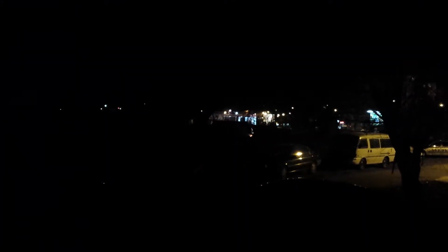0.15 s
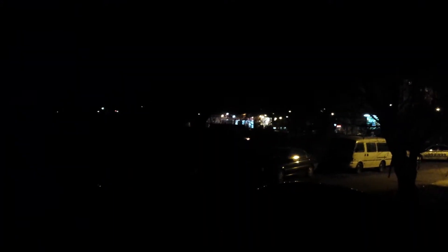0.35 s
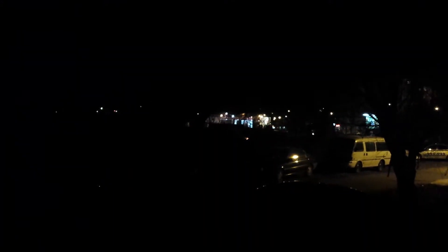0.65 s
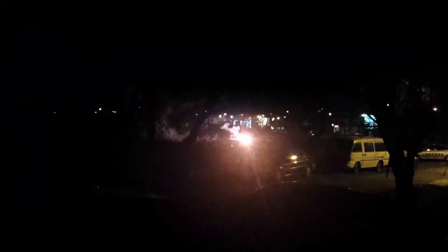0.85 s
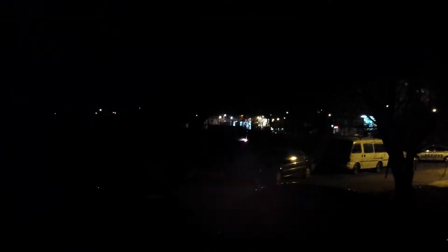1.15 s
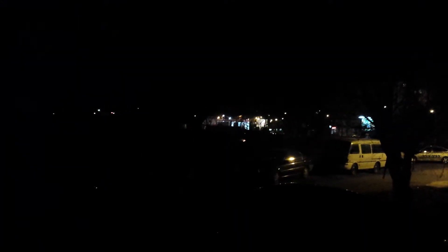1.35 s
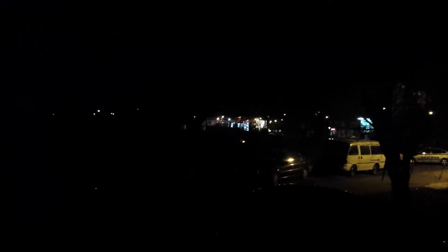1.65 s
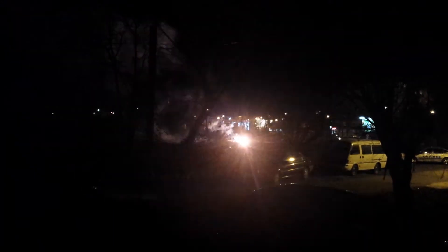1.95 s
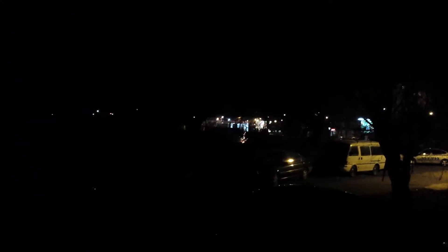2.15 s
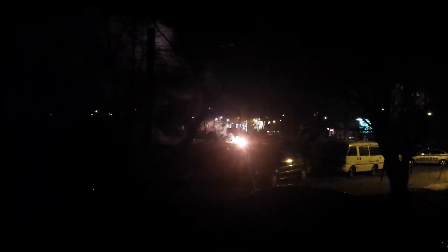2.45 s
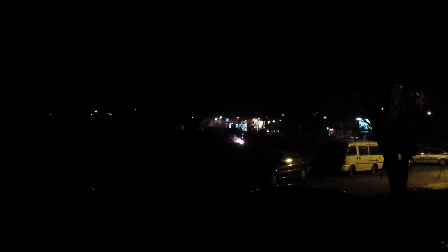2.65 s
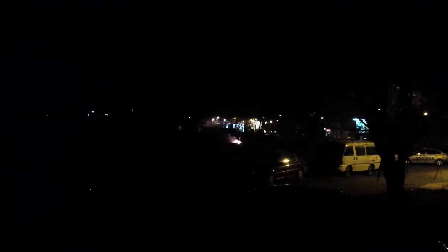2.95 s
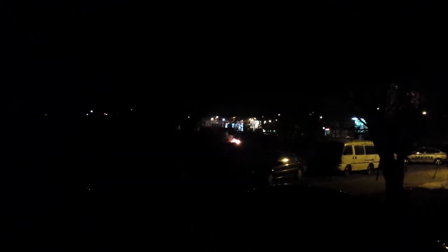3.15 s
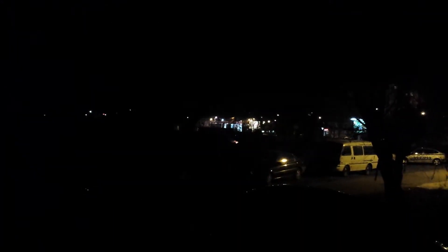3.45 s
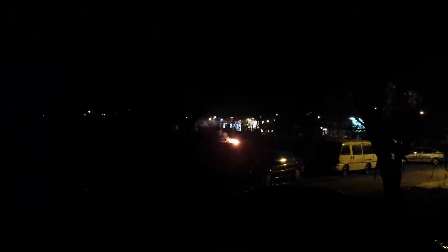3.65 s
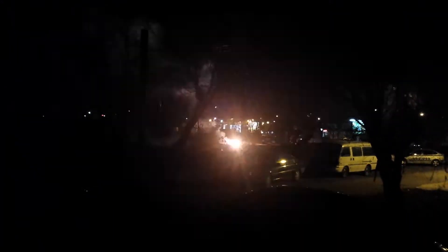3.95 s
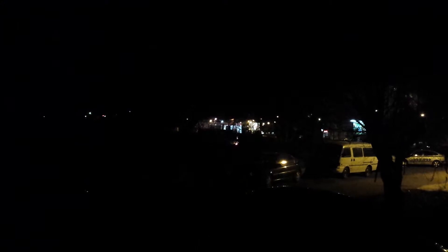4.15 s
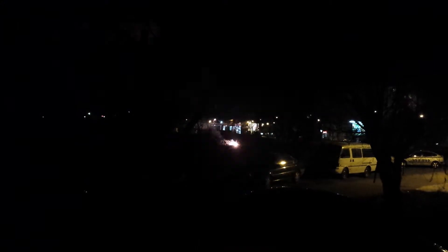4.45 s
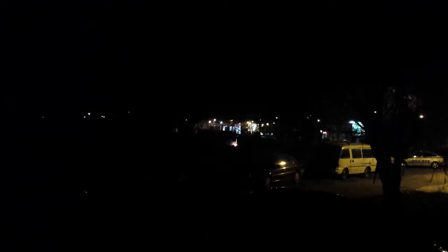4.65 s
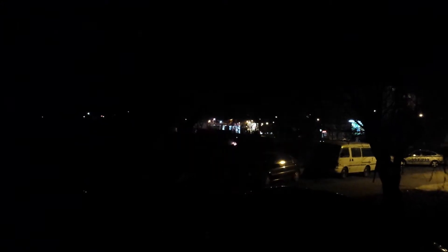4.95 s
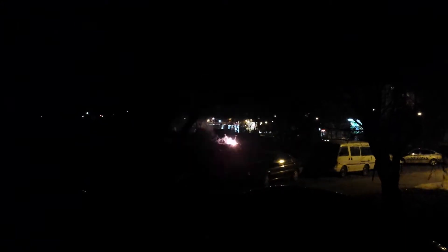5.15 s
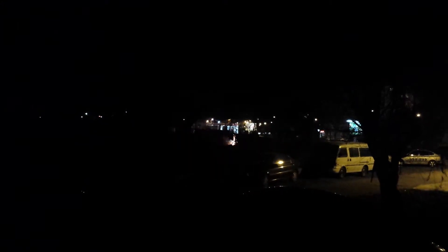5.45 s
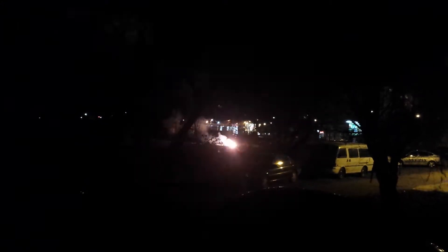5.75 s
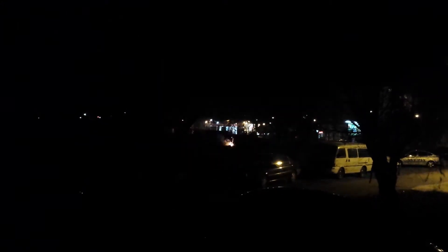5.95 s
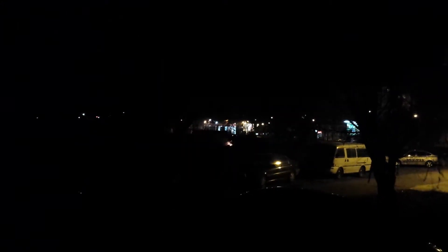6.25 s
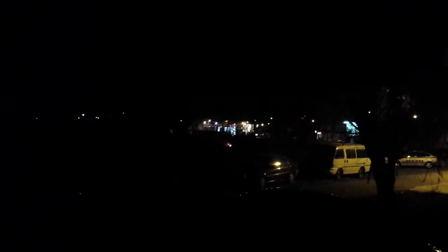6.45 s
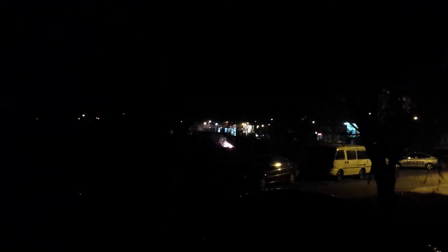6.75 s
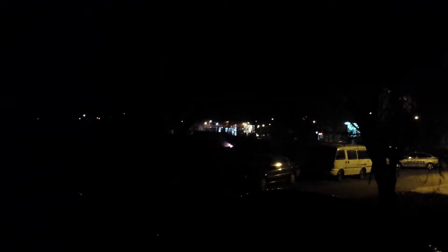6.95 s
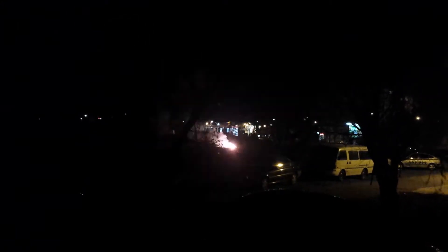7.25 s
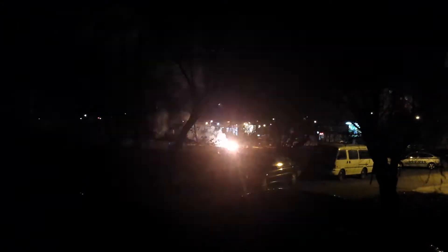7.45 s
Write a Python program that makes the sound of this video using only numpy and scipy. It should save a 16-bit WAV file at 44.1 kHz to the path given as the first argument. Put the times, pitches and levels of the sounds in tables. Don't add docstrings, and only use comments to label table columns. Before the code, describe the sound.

Sharp electrical zaps buzz at a hundred strikes per second in very short flares, mixed with single loud cracks. They are scattered at first, then tumble irregularly with only brief gaps. Dull low thumps and woody knocks of burning sheath sit underneath. The open outdoor space answers with a scattered tail and a late dull wall echo, over low distant traffic. Phone pickup, left-leaning, with thin deep bass and limited top treble.

```python
import sys
import numpy as np
from scipy import signal
from scipy.fft import rfft, irfft, next_fast_len
from scipy.io import wavfile
from scipy.ndimage import uniform_filter1d, minimum_filter1d

SR = 44100
rng = np.random.default_rng(int(sys.argv[2]) if len(sys.argv) > 2 else 0)


def dump_mix(stems):
    frames = np.atleast_2d(stems).T
    limited = np.clip(frames, -1, 1)
    pcm = np.round(limited * 32767).astype(np.int16)
    wavfile.write(sys.argv[1], SR, pcm)


def attenuation_scalar(level_db):
    decades = np.asarray(level_db, float) / 20
    return 10 ** decades


N = 334674
HALF_WAVE = 0.01

# (frequency [Hz], level [dB])
LEFT_PORT = [(500, -38), (1000, -54), (1900, -18.5), (2900, -20), (4400, -1.5), (5300, -0.5), (5900, 6),
             (6400, -2), (7400, -13.5), (8400, -20), (9800, -33.5), (12300, -44.5), (13000, -42),
             (15000, -70.5)]
# (frequency [Hz], likeness [-1 to 1])
COHERENCE = [(60, 1), (170, 0.88), (500, 0.84), (1460, -0.074), (4250, -0.14), (12300, -0.12)]


def evened(x):
    return x / np.sqrt(np.mean(x ** 2) + 1e-20)


def read(points, hz):
    f, value = np.transpose(points)
    return np.interp(np.log(hz + 1), np.log(f + 1), value)


def causal(points, size=4096):
    hz = abs(np.fft.fftfreq(size, 1 / SR))
    log_gain = np.log(attenuation_scalar(np.maximum(read(points, hz), -100)))
    return np.fft.ifft(np.exp(np.conj(signal.hilbert(log_gain)))).real[:size // 2]


def spikes(s, size):
    place = np.clip((s * SR).astype(int), 0, N + 1)
    return np.bincount(place.ravel(), size.ravel(), N + 2)[:N]


def burns(glow_crackle_db=-8, sizzle_db=-12, spark_thump_db=-13, second_strike=0.53):
    # (first strike [s], length [s], crackle [dB], thump [dB], sizzle over crackle [dB])
    flares = [(0.245, 0.034, -15, -28, -17), (1.166, 0.051, -17.5, -27.5, -19),
              (1.366, 0.039, -21.5, -30.5, -14.5), (2.153, 0.093, -20, -26.5, -12.5),
              (2.257, 0.039, -19.5, -25.5, -12.5), (2.65, 0.042, -17.5, -32.5, -4),
              (2.679, 0.052, -18, -34, -17.5), (2.968, 0.051, -24, -29, -21),
              (3.018, 0.051, -15, -32.5, -26.5), (3.208, 0.033, -18.5, -31, -20),
              (3.488, .068, -18, -29, -21.5), (3.557, 0.048, -29, -29, -47),
              (3.818, 0.034, -13, -32, -24.5), (4.235, 0.042, -18.5, -29.5, -7),
              (4.595, 0.089, -26.5, -29.5, -12.5), (4.728, 0.026, -28, -30, -12),
              (4.873, 0.04, -16.5, -26, -22.5), (5.283, 0.052, -19.5, -24, -15.5),
              (5.585, 0.047, -18, -22, -20), (5.631, 0.077, -19.5, -21, -16),
              (6.072, 0.064, -21.5, -21.5, -17), (6.327, 0.061, -18.5, -29, -19.5),
              (7.077, 0.059, -21, -30.5, -15.5), (7.509, .06, -13.5, -32.5, -16.5)]
    # (time [s], crackle [dB], thump [dB], sizzle over crackle [dB], hollowness [dB])
    pairs = [(1.474, -14.5, -26.5, -20, 0.5), (2.868, -21, -32, -26, 2.5), (2.898, -14.5, -29, -25, 0),
             (3.269, -26, -27, -30, 0), (3.338, -17, -30.5, -28, 1.5), (3.397, -16, -46.5, -18, 0.5),
             (3.428, -14, -27.5, -27.5, -2), (3.689, -19, -27.5, -13, 3), (3.948, -25.5, -26, -11, -3),
             (3.999, -25, -22, -28, 2), (4.12, -20.5, -42, -21, -9), (4.167, -14, -30.5, -24, -4),
             (4.575, -14, -29, -24, -2.5), (5.015, -22.5, -26.5, -20.5, -4), (5.212, -16.5, -26, -17, -3.5),
             (5.559, -20.5, -24.5, -23, -11), (5.926, -31, -26.5, -29, 4), (6.177, -18, -33, -18, 2.5),
             (6.199, -25, -27, -29, 4), (6.297, -18, -48, -26, 7.5), (6.41, -21.5, -26, -22, -1),
             (6.468, -22.5, -27.5, -12, 13.5), (7.208, -19, -27.5, -20.5, 6),
             (7.418, -25, -26.5, -13.5, -2)]
    # (time [s], crackle [dB], thump [dB], sizzle over crackle [dB])
    snaps = [(0.596, -16.5, -22.5, -20.5), (0.612, -11, -27.5, -24.5), (0.866, -12.5, -29, 0),
             (1.316, -9, -26.5, -30), (2.147, -5, -33.5, -27.5), (2.757, -16, -27, -33),
             (2.828, -12.5, -27.5, -30), (3.104, -8, -57, -16), (3.126, -20, -26, -5),
             (3.19, -16.5, -40, -26), (3.318, -22.5, -31, -48), (3.72, -17, -27.5, -31),
             (4.141, -10, -34, -23), (4.197, -13.5, -29, -21), (4.303, -22.5, -32, -4),
             (4.827, -12.5, -33, -26), (5.089, -27, -24.5, -26), (5.408, -16, -46, -23),
             (5.448, -20, -27.5, -16), (5.468, -17.5, -30.5, -23), (5.808, -22, -28, -21),
             (5.845, -28.5, -30, -35), (6.014, -5, -17, -22.5), (6.042, -15, -11.5, -3),
             (6.239, -22, -43, -15.5), (6.279, -18, -29.5, -26), (6.968, -28, -28.5, -2.5),
             (7.059, -28, -31, -20), (7.338, -13, -26, -20.5), (7.587, -17, -28, -11)]
    # (first strike [s], length [s], thump [dB])
    glows = [(1.219, 0.085, -59), (2.766, 0.084, -36), (2.919, .05, -44), (3.067, .1, -31),
             (3.368, 0.044, -27), (3.455, 0.026, -33), (3.857, 0.13, -31.5), (4.272, 0.055, -31),
             (4.839, 0.043, -33.5), (5.034, 0.093, -34.5), (5.196, 0.065, -33.5), (5.338, 0.089, -37),
             (5.704, 0.021, -33), (5.857, 0.039, -28.5), (6.143, 0.087, -30.5), (7.144, 0.021, -47),
             (1.327, 0.0094, -27), (2.727, .03, -35), (0.289, 0.031, -37), (6.492, 0.018, -36)]
    # (time [s], crackle [dB])
    stray = [(.158, -48), (0.291, -29), (.302, -16.5), (0.31, -17), (0.858, -40), (2.777, -23),
             (3.587, -27), (4.009, -28), (4.07, -29.5), (4.13, -23), (2.715, -18.5), (5.703, -27),
             (5.89, -49), (4.569, -27.5), (5.198, -36), (6.93, -41), (7.169, -21.5), (7.189, -17),
             (7.438, -23.5)]
    rows = [(s, HALF_WAVE, *rest, 0) for s, *rest in snaps]
    rows += [(*row, 0) for row in flares]
    pair_length = (1 + second_strike) * HALF_WAVE
    rows += [(s, pair_length, *rest) for s, *rest in pairs]
    rows += [(s, length, low + glow_crackle_db, low, sizzle_db, 0) for s, length, low in glows]
    rows += [(s, HALF_WAVE, db, db + spark_thump_db, sizzle_db, 0) for s, db in stray]
    return np.array(rows).T[..., None]


def strikes(count=12):
    start, length = burns()[:2]
    k = np.arange(count)
    return start + k * HALF_WAVE, np.sqrt(np.clip(length / HALF_WAVE - k, 0, 1))


def crackle(uneven_db=2.5, jitter_s=0.0006, rise_s=0.001, fall_s=0.002, after_s=0.004, after=0.2,
            lumpy_db=2.5, flare_tint_db=1.5, strike_tint_db=2.0, sizzle_spread_db=0.5,
            again_db=-10, hot_db=-19):
    band_edges = [-999, 2800, 4300, 5500, 7200, 9500, SR]
    s, burn = strikes()
    db, sizzle_db, hollow_db = burns()[[2, 4, 5]]
    sizzle_db = sizzle_db + sizzle_spread_db * rng.standard_normal(s.shape)
    chance = rng.standard_normal(s.shape + (4,))
    size = burn * attenuation_scalar(db + uneven_db * chance[..., 0])
    early = s + jitter_s * chance[..., 1]

    again = attenuation_scalar(again_db + 1.02 * chance[..., 2] + 0.33 * np.minimum(db - hot_db, 0))
    late = s + HALF_WAVE * (0.5 + 0.13 * chance[..., 3])

    flare_tint = flare_tint_db * rng.standard_normal((len(s), 1, len(band_edges)))
    strike_tint = strike_tint_db * rng.standard_normal(s.shape + (len(band_edges),))
    tint_db = flare_tint + strike_tint

    t = np.arange(-441, 442) / SR
    fall = (1 - after) * np.exp(-(t / fall_s) ** 2) + after * np.exp(-abs(t) / after_s)
    spit = np.where(t < 0, np.exp(-(t / rise_s) ** 2), fall)
    spit /= np.sqrt(np.sum(spit ** 2) / (HALF_WAVE * SR))
    lumps = evened(uniform_filter1d(rng.standard_normal(N), size=24))
    noise = evened(rng.standard_normal(N) * attenuation_scalar(lumpy_db * lumps))

    size_fft = next_fast_len(N)
    hz = np.fft.rfftfreq(size_fft, 1 / SR)
    sizzle_share = (0, 0, 0.064, 0.2, 0.91, 0.81)
    hollow_share = (0, 0, 1, -1, 0, 0)
    spectrum = 0
    for k, (lo, hi) in enumerate(zip(band_edges, band_edges[1:])):
        lift_db = sizzle_share[k] * np.clip(sizzle_db + 18.0, -15, 12)
        gain = size * attenuation_scalar(tint_db[..., k] + hollow_share[k] * hollow_db + lift_db)
        gate = signal.oaconvolve(spikes(early, gain) + spikes(late, gain * again), spit, "same")
        band = np.clip((hz - lo) / 1000 + 0.5, 0, 1) - np.clip((hz - hi) / 1000 + 0.5, 0, 1)
        spectrum = spectrum + rfft(gate * noise, size_fft) * band
    return irfft(spectrum, size_fft)[:N] / np.linalg.norm(causal(LEFT_PORT))


def thump(uneven_db=1.0, lag_s=-0.00089, jitter_s=0.001167, flutter=0.37):
    # (frequency [Hz], level [dB])
    push_spectrum = [(18, -99), (30, -6), (87, 2.5), (129, -1), (182, 3.5), (240, -3.5), (287, -1),
                     (412, -7.5), (477, -15.5), (792, -19), (1050, -29.5), (1500, -34.5), (1950, -88),
                     (3300, -120)]
    s, burn = strikes()
    size = burn * attenuation_scalar(burns()[3])
    chance = rng.standard_normal(s.shape + (4,))
    push = spikes(s + lag_s + jitter_s * chance[..., 0], size * attenuation_scalar(uneven_db * chance[..., 1]))
    loose = spikes(s + lag_s + 0.42 * HALF_WAVE * chance[..., 2], size * flutter * chance[..., 3])
    shape = causal(push_spectrum)
    shape = shape / np.linalg.norm(shape)
    return signal.oaconvolve(push + loose, shape)[:N] * np.sqrt(HALF_WAVE * SR)


def pop(hz, t60=0.043, rough=1.1, rise_s=0.00091):
    t = np.arange(2000) / SR
    wobble = evened(uniform_filter1d(rng.standard_normal(len(t)), size=30))
    envelope = np.minimum(t / rise_s, 1) * attenuation_scalar(-60 * t / t60)
    return envelope * (1 + rough * wobble) * np.sin(2 * np.pi * hz * t)


def pops(count=16, low_hz=1094, high_hz=2640, pop_db=-33, per_thump=0.66, spread_db=2.5):
    # (time [s], peak [dB], pitch [Hz])
    knocks = [(1.477, -18.5, 2835), (3.395, -25.5, 1760), (3.486, -27, 1727), (3.847, -19, 1865),
              (4.577, -21, 2230), (4.831, -28, 1970), (4.838, -21.5, 1860), (5.085, -41, 1880),
              (6.015, -17.5, 1210), (6.117, -27, 1780), (6.177, -20, 1180), (6.343, -21, 1770)]
    s, burn = strikes()
    spread = spread_db * rng.standard_normal(s.shape)
    size = burn * attenuation_scalar(pop_db + per_thump * (burns()[3] + 28.5) + spread)
    kind = rng.integers(0, count, s.shape)
    out = np.zeros(N)
    for k, hz in enumerate(np.geomspace(low_hz, high_hz, count)):
        out += signal.oaconvolve(spikes(s, size * (kind == k)), pop(hz))[:N]
    for moment, db, hz in knocks:
        out[round(moment * SR):][:2000] += attenuation_scalar(db) * pop(hz)
    return out


def echoes(x, gap_s=0.0022, turn_s=0.13, density=0.06):
    # (frequency [Hz], reverberation time [s])
    decay = [(60, 0.5), (300, 0.78), (1000, 2.04), (3000, 0.99), (4200, 0.63), (4700, 0.97), (5200, 0.65),
             (6500, 0.68), (9000, 0.53), (12000, 0.63)]
    # (frequency [Hz], level [dB])
    wet = [(60, -4.5), (300, -1), (1000, 3.5), (3000, 3), (4600, -7), (5900, -10.5), (6500, -7), (9000, -3),
           (10500, -3), (12000, -10)]
    hz = np.fft.rfftfreq(512, 1 / SR)[:, None]
    same = np.clip(read(COHERENCE, hz), -1, 1)
    t60 = read(decay, hz)
    span = 3 * SR // 4
    out = np.zeros((2, N))
    for k in range(3):
        taps = rng.choice([-1.0, 1.0], (2, span)) * (rng.random((2, span)) < density)
        taps = taps * (np.arange(span) > gap_s * SR)
        _, t, (a, b) = signal.stft(taps, SR, nperseg=512)
        fade = attenuation_scalar(read(wet, hz) - 60 * t / t60)
        fade = fade / np.sqrt(density * SR * t60 / (6 * np.log(10)))
        pair = np.array([a, same * a + np.sqrt(1 - same ** 2) * b])
        tail = signal.istft(pair * fade, SR, nperseg=512)[1]
        share = np.sqrt(2 / 3) * np.cos(np.pi * (np.arange(N) / SR / turn_s + k) / 3)
        out += signal.fftconvolve(x * share, tail, axes=1)[:, :N]
    return out


def far_wall(x, delay_s=0.392, db=-11, dull_hz=170):
    late = np.pad(x, (round(delay_s * SR), 0))[:N]
    return attenuation_scalar(db) * signal.sosfilt(signal.butter(2, dull_hz, fs=SR, output="sos"), late)


def traffic(level_db=-44.5, patchy_db=2.5, swell_db=1.0, fade_db_per_s=-2.2, rumble_hz=130):
    # (frequency [Hz], spectral density [dB per Hz])
    wash = [(24, -56), (40, -19), (70, 1), (222, -21.5), (405, -14), (611, -17), (673, -19), (1170, -17.5),
            (1600, -19.5), (1810, -15), (3000, -31), (4530, -29), (10000, -46), (12800, -45), (14600, -46),
            (16600, -62), (22000, -120)]
    # (frequency [Hz], left over right [dB])
    balance = [(60, -2.5), (170, 6), (500, 0), (1460, 3), (4250, 9), (12300, -3.5)]
    frames = N // 256 + 5
    hz = np.fft.rfftfreq(1024, 1 / SR)[:, None]
    a, b, c, d, patches = rng.standard_normal((frames, 513, 5)).T
    patches = uniform_filter1d(patches, size=8, axis=0)
    patches = evened(uniform_filter1d(patches, size=14, axis=1))
    swell = evened(uniform_filter1d(rng.standard_normal(frames), size=30))
    same = np.clip(read(COHERENCE, hz), -1, 1)
    left = a + 1j * b
    z = np.array([left, same * left + np.sqrt(1 - same ** 2) * (c + 1j * d)])
    z *= attenuation_scalar(read(wash, hz) + patchy_db * patches + swell_db * swell)
    seconds = np.arange(frames) * 256 / SR
    z *= attenuation_scalar(fade_db_per_s * (seconds - 3) / (1 + (hz / rumble_hz) ** 4))
    z *= attenuation_scalar(np.array([0.5, -0.5])[:, None, None] * read(balance, hz))
    return attenuation_scalar(level_db) * evened(signal.istft(z, nperseg=1024, noverlap=768)[1][:, :N])


def scene():
    # (frequency [Hz], level [dB])
    right_port = [(500, -33.5), (1000, -32.5), (1400, -28.5), (2000, -26.5), (3000, -23.5), (3600, -18.5),
                  (4800, -14.5), (6800, -14.5), (8800, -18.5), (10500, -27.5), (12300, -31.5),
                  (13000, -45.5), (15000, -65)]
    spit, push = crackle(), thump()
    ports = np.array([signal.oaconvolve(spit, causal(port))[:N] for port in (LEFT_PORT, right_port)])
    lean = attenuation_scalar(np.array([[0.8], [-1.6]]))
    arc = attenuation_scalar(-3.0) * ports + lean * np.array([push, np.roll(push, shift=2)])
    sheath = attenuation_scalar(np.array([[-5], [-10]])) * pops()
    return arc + sheath + echoes(arc + 0.5 * sheath) + lean * far_wall(push) + traffic()


def gate_treble(x, under_db=-23.0, from_hz=7000, attack_db=-13.5, jump=2.6):
    hz, _, z = signal.stft(x, SR, nperseg=512)
    power = uniform_filter1d(abs(z) ** 2, size=6, axis=1)
    power = uniform_filter1d(power, size=3, axis=2)
    middle = power[:, (hz > 1500) & (hz < 8000)].mean((0, 1))
    attack = middle > jump * np.roll(middle, shift=3)
    strong = power > middle * attenuation_scalar(2 * (under_db + attack_db * attack))
    kept = strong | (hz < from_hz)[:, None]
    return signal.istft(z * kept, SR, nperseg=512)[1][:, :N]


def roll_off(x):
    return signal.sosfilt(signal.butter(12, 14600, fs=SR, output="sos"), x)


def record(dry):
    ceiling = 0.93
    dry = signal.sosfilt(signal.butter(2, 40, "high", fs=SR, output="sos"), dry)
    gain = np.minimum(ceiling / (abs(dry).max(0) + 1e-9), 1)
    held = dry * uniform_filter1d(minimum_filter1d(gain, size=89), size=89)
    mix = gate_treble(held)
    return roll_off(mix)


dry = scene()
out = record(dry)
dump_mix(out)
```